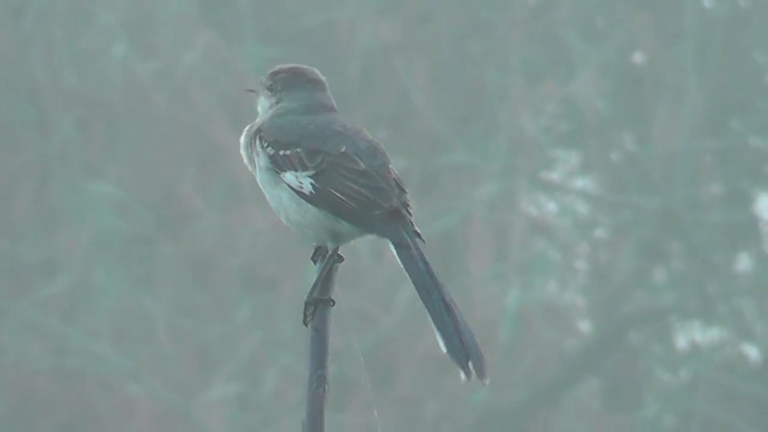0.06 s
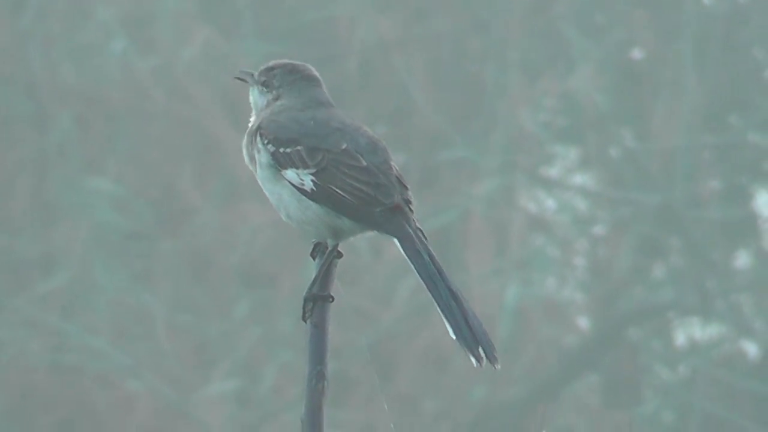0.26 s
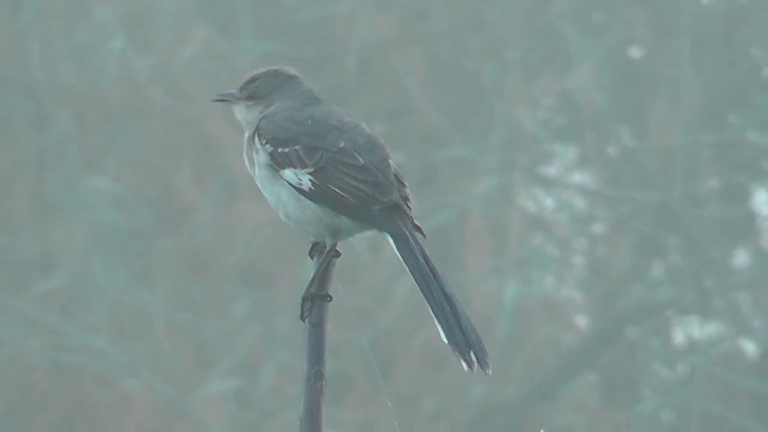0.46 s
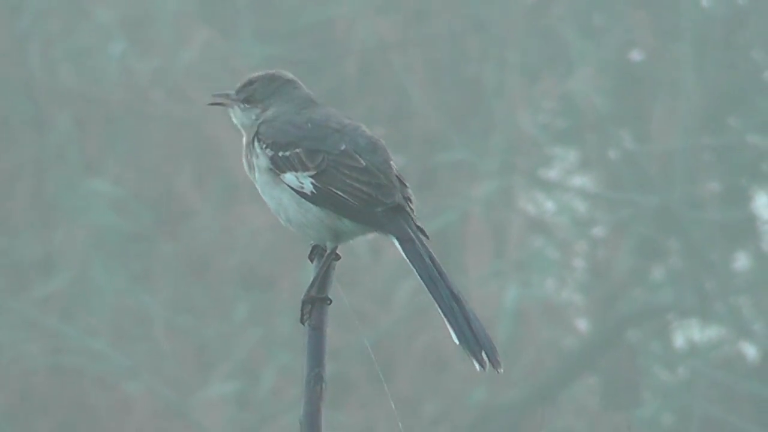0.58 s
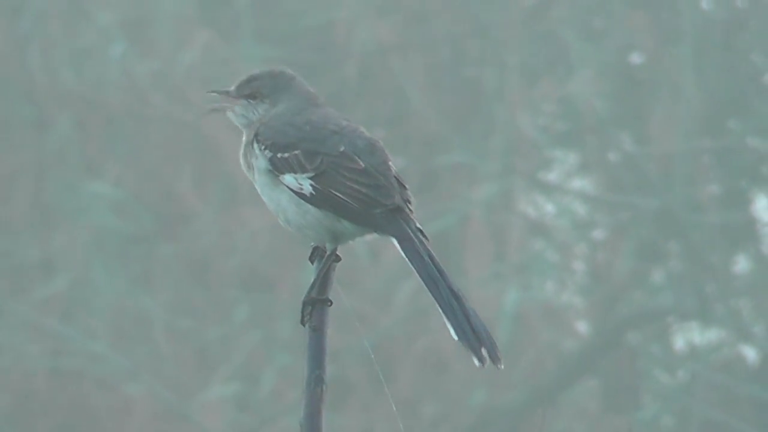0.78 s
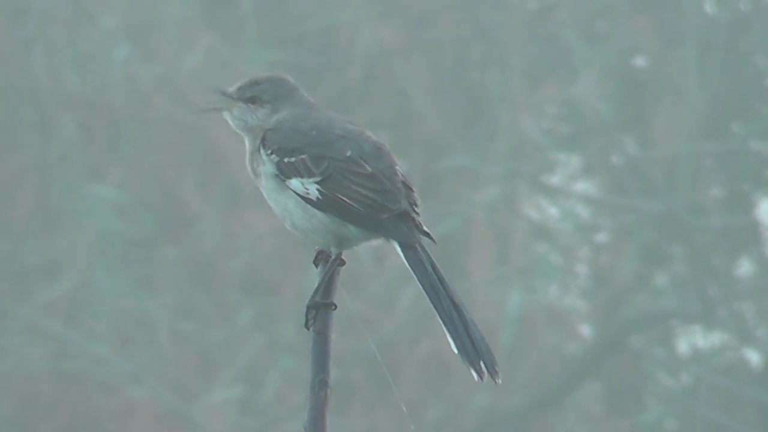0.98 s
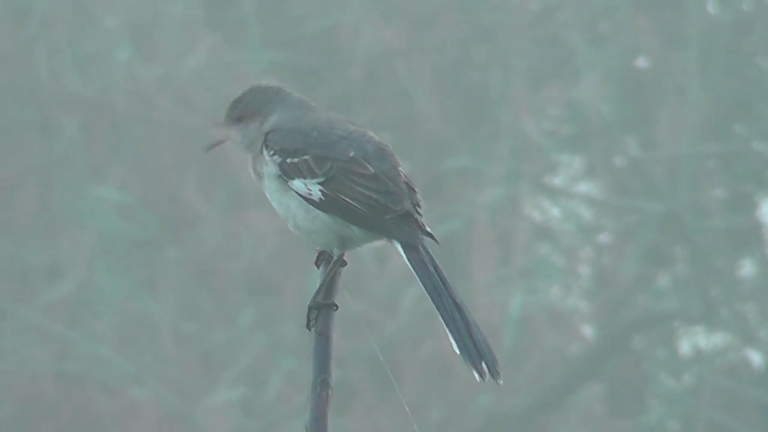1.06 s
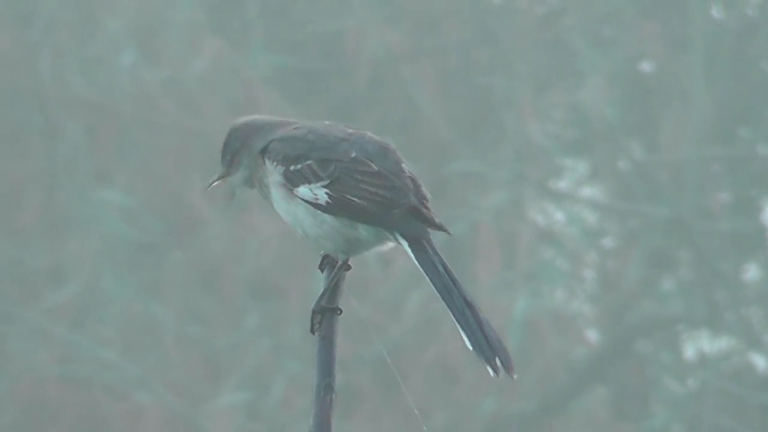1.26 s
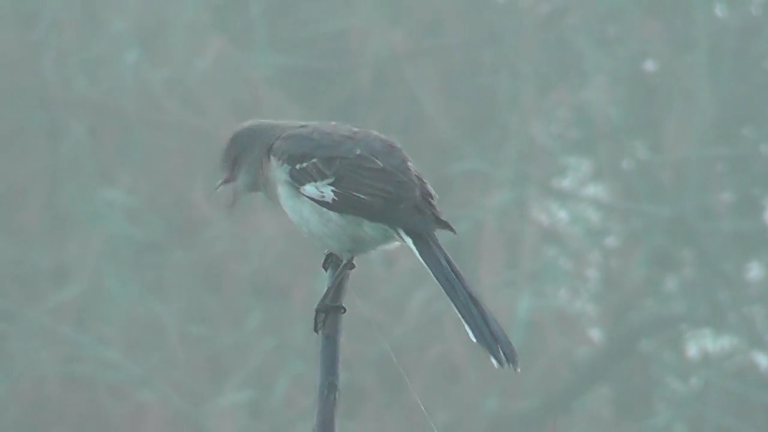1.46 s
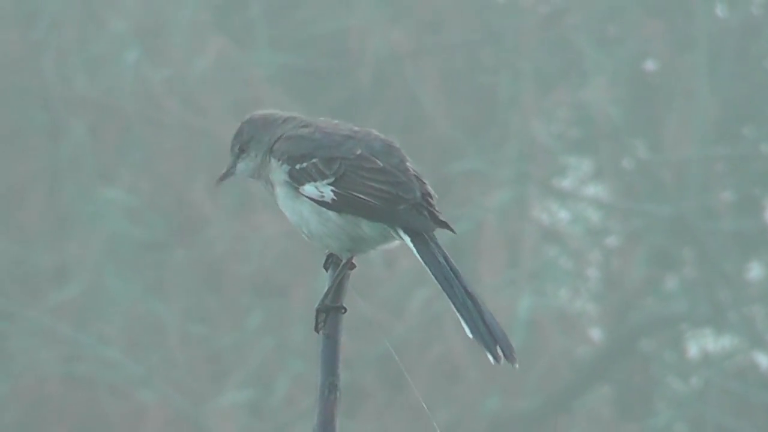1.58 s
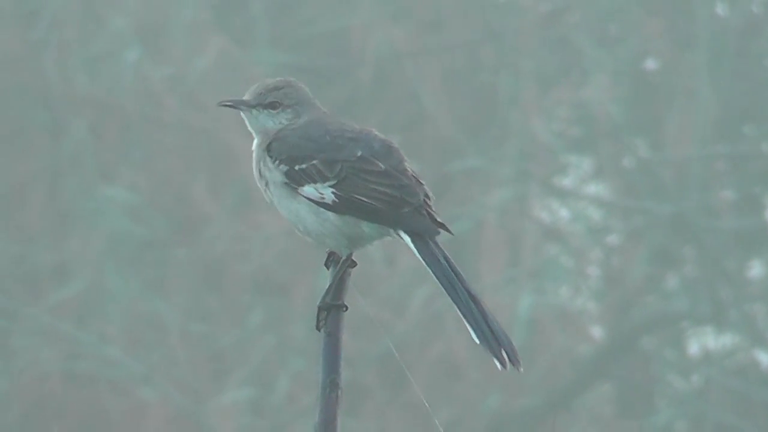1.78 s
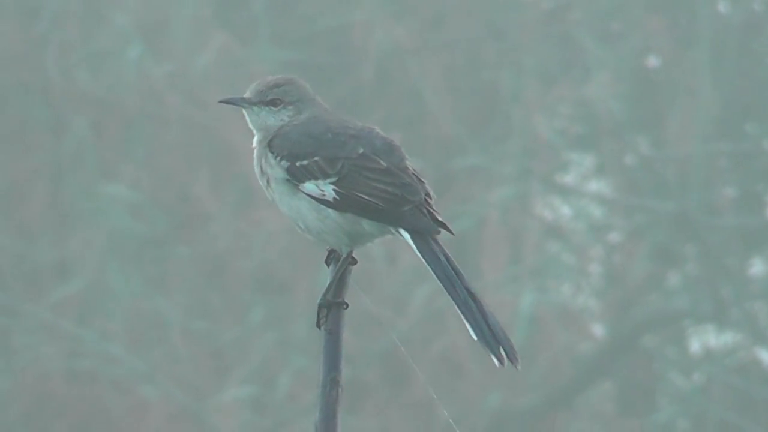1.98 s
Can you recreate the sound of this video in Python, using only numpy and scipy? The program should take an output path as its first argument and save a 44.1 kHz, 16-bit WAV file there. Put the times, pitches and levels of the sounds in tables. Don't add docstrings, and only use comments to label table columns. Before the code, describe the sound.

A songbird a few metres away sings quick falling whistles, sharp chips, husky rasps and a buzzy chord, lightly echoed by trees, over thin cricket trills and a steady distant road rush, on a small camera microphone.

```python
import sys
import numpy as np
from scipy import signal
from scipy.fft import rfft, irfft, next_fast_len
from scipy.io import wavfile
from scipy.ndimage import uniform_filter1d, map_coordinates

SR = 44100
rng = np.random.default_rng(int(sys.argv[2]) if len(sys.argv) > 2 else 0)


def gain_from_decibels(decibels):
    exponent = np.asarray(decibels, float) / 20
    return 10 ** exponent


def store_pcm(level_fs):
    pcm = np.round(np.clip(level_fs, -1, 1) * 32767).astype(np.int16)
    wavfile.write(sys.argv[1], SR, np.atleast_2d(pcm).T)


N = 90405


def unit(x):
    return x / np.sqrt(np.mean(x ** 2) + 1e-20)


def along(points, hz, closed=False):
    f, v = np.transpose(points)
    ends = dict(left=-120, right=-120) if closed else {}
    return np.interp(np.log(hz + 1), np.log(f + 1), v, **ends)


def wobble(rate_hz, size=N):
    knots = rng.standard_normal(int(size * rate_hz / SR) + 4)
    return map_coordinates(knots, [np.arange(size) * rate_hz / SR])


def filtered(x, response):
    m = next_fast_len(N + SR // 2)
    return irfft(rfft(x, m) * response(np.fft.rfftfreq(m, 1 / SR)), m)[..., :N]


def coloured_noise(spectrum):
    return unit(filtered(rng.standard_normal(N), lambda hz: gain_from_decibels(along(spectrum, hz, True))))


def placed(x, lean, lead):
    def ports(hz):
        left_over_right = gain_from_decibels(along(lean, hz)) * np.exp(1j * along(lead, hz))
        return left_over_right ** np.array([[.5], [-.5]])
    return filtered(x, ports)


def tone(hz, order=1):
    phase = order * 2 * np.pi * np.cumsum(hz) / SR + rng.uniform(0, 2 * np.pi)
    return np.sqrt(2) * np.sin(phase) * (order * hz < SR / 2)


def add(out, s, x):
    part = out[round(s * SR):][:len(x)]
    part += x[:len(part)]


def progress(length_s):
    return np.arange(0, length_s, 1 / SR) / length_s


def follow(rows):
    s, *cols = np.transpose(rows)
    t = np.arange(s[0], s[-1], 1 / SR)
    gate = np.clip(np.minimum(t - s[0], s[-1] - t) / 0.0016, 0, 1)
    return [uniform_filter1d(np.interp(t, s, c), size=60) for c in cols] + [gate]


# f/Hz, likeness [0-1]
PORT_LIKENESS = [(130, 0.63), (400, 0.89), (800, 0.62), (1500, 0.38), (3000, 0.68), (6800, 0.81),
                 (9000, 0.52), (15000, 0.4)]
# f/Hz, level/dB
BACKGROUND_LEAN = [(60, -3), (150, -5), (380, -5), (950, 2), (2380, 1), (5980, 1.5), (15000, 0.5)]
# f/Hz, phase/rad
BACKGROUND_LEAD = [(100, .3), (430, 0.57), (1100, 0.5), (1700, 0.89), (2500, 0)]


def rush(spectrum, patchy_db):
    z = signal.stft(rng.standard_normal((2, N)), nperseg=512)[2]
    field = uniform_filter1d(rng.standard_normal(z.shape[1:]), size=6, axis=0)
    field = uniform_filter1d(field, size=12, axis=1)
    pair = signal.istft(z * gain_from_decibels(patchy_db * unit(field)), nperseg=512)[1][:, :N]

    def mid_side(hz):
        turn = np.arccos(np.clip(along(PORT_LIKENESS, hz), -1, 1)) / 2
        return gain_from_decibels(along(spectrum, hz, True)) * [np.cos(turn), np.sin(turn)]

    mid, side = filtered(pair, mid_side)
    return unit(placed(np.array([mid + side, mid - side]), BACKGROUND_LEAN, BACKGROUND_LEAD))


# f/Hz, level/dB per Hz
ROAD_SPECTRUM = [(60, -63), (200, -38), (330, -14.5), (445, -10), (540, -3.5), (760, -2.5), (1200, -11),
                 (1800, -20.5)]


def road():
    return gain_from_decibels(-39 + .5 * wobble(2.26)) * rush(ROAD_SPECTRUM, patchy_db=0.4)


# f/Hz, level/dB per Hz
AIR_SPECTRUM = [(1250, -11.5), (1900, 1), (4000, -6.5), (5200, -6.5), (7500, -9.5), (9000, -13),
                (13000, -12.5), (15800, -15)]


def air():
    return gain_from_decibels(-49) * rush(AIR_SPECTRUM, patchy_db=1.47)


# f/Hz, level/dB per Hz
CHORUS_SPECTRUM = [(5300, -22.5), (5900, -2.5), (6300, 3.5), (6700, -7), (7000, -19)]


def far_chorus():
    return gain_from_decibels(-52) * rush(CHORUS_SPECTRUM, patchy_db=1.2)


# stroke rate/Hz, middle of the first stroke t/s
WING_STROKES = [(43.72, .0124), (44.85, .0150)]
# top f/Hz, level/dB, sounding share of the cycle [0-1]
CRICKET_VOICES = [
    (6834, -45.5, .56),
    (6750, -50, .58),
]


def crickets():
    sag_hz, stroke_lean, octave_db = 505.4, 0.14, -19.5
    out, t = np.zeros(N), np.arange(N) / SR
    for (rate_hz, first_s), (top_hz, db, share) in zip(WING_STROKES, CRICKET_VOICES):
        cycle = ((t - first_s) * rate_hz + .5) % 1 - .5
        u = np.clip(cycle * 2 / share, -1, 1)
        hz = top_hz - sag_hz * (u + stroke_lean) ** 2 + 25 * wobble(200)
        level = gain_from_decibels(db + 0.58 * wobble(30.0) + .4 * wobble(1.3))
        swell = level * np.cos(np.pi * u / 2) ** 0.3
        out += swell * (tone(hz) + gain_from_decibels(octave_db) * tone(hz, order=2))
    return out


# delay t/s, level/dB
BRANCH_ECHOES = [
    (.004, -21),
    (.0105, -22),
    (.0165, -18),
    (.026, -22),
]
# f/Hz, level/dB
LEAF_REFLECTION = [(2300, -3), (4200, -2.5), (5500, 1.5), (9000, 6)]


def trees(x):
    near_t60_s, far_t60_s, far_db = 0.47, 1, -12
    tail_db, alike, smear_s = -12.5, 0.7, .005
    t = np.arange(SR // 2) / SR
    shared, separate = rng.standard_normal(len(t)), rng.standard_normal((2, len(t)))
    leaves = np.sqrt(alike) * shared + np.sqrt(1 - alike) * separate
    tail = gain_from_decibels(-60 * t / near_t60_s) + gain_from_decibels(far_db - 60 * t / far_t60_s)
    tail = tail * np.clip(t / 0.00095, 0, 1)
    tail = tail * gain_from_decibels(tail_db) / np.linalg.norm(tail)
    for delay_s, db in BRANCH_ECHOES:
        bump = np.exp(-np.abs(t - delay_s) / smear_s * 2)
        tail = np.hypot(tail, gain_from_decibels(db) * bump / np.linalg.norm(bump))
    bright = filtered(x, lambda hz: gain_from_decibels(along(LEAF_REFLECTION, hz)))
    return signal.fftconvolve(bright[None], leaves * tail, axes=1)[:, :N]


# t/s, peak level/dB
TWIG_SNAPS = [
    (1.689, -31),
    (1.789, -36.5),
]


def twig_snaps():
    out = np.zeros(N)
    t = np.arange(100) / SR
    for s, db in TWIG_SNAPS:
        add(out, s, gain_from_decibels(db - 60 * t / .002) * np.diff(rng.standard_normal(len(t) + 1)) / 2)
    return out


# t/s, length/s, from f/Hz, to f/Hz, level/dB
SMALL_SLIDES = [(0.212, 0.0081, 3500, 3200, -36.5), (.335, 0.014, 5560, 5600, -45),
                (0.676, 0.018, 5450, 5450, -44), (1.298, .02, 7400, 7400, -55),
                (.933, 0.01894, 5300, 4500, -49), (0.802, .006, 8000, 7950, -55),
                (1.276, 0.021, 2325, 3280, -53), (1.523, 0.029, 4350, 3550, -51),
                (1.52, 0.02, 4890, 4361, -54), (1.526, 0.037, 5810, 5400, -49),
                (1.616, 0.019, 3426, 3500, -50), (1.6569, 0.006, 2730, 2720, -43),
                (1.6675, 0.0098, 2670, 2615, -44.5), (1.7115, 0.0068, 4390, 4120, -53),
                (1.739, 0.012, 4560, 3800, -49), (1.773, 0.024, 5600, 5380, -46)]


def small_slides():
    out = np.zeros(N)
    for s, length_s, from_hz, to_hz, db in SMALL_SLIDES:
        u = progress(length_s)
        hz = from_hz + (to_hz - from_hz) * u + 85 * wobble(290, len(u))
        swell = np.sin(np.pi * u ** .7)
        add(out, s, gain_from_decibels(db) * swell * tone(hz))
    return out


# t/s, length/s, from f/Hz, to f/Hz, level/dB
HUSKY_RASPS = [
    (.335, .035, 4800, 3300, -44.5),
    (0.16, 0.062, 2036, 4100, -41),
    (0.9, 0.049, 3500, 2540, -44.5),
    (1.13, 0.053, 2000, 3500, -44),
    (1.424, 0.049, 2150, 3250, -44),
    (1.8, 0.045, 2300, 2900, -45.5),
    (1.609, .032, 2350, 3050, -52),
]


def rasps():
    shake_hz, depth, rough_hz = 600, .7, 340
    out = np.zeros(N)
    for s, length_s, from_hz, to_hz, db in HUSKY_RASPS:
        u = progress(length_s)
        shake = depth * shake_hz * tone(shake_hz * (1 + 0.1295 * wobble(150.3, len(u))))
        hz = from_hz + (to_hz - from_hz) * u + shake + rough_hz * wobble(898.3, len(u))
        grain = gain_from_decibels(db + 3 * wobble(403, len(u)))
        swell = np.abs(np.sin(np.pi * u ** 1.27)) ** .65
        add(out, s, grain * swell * tone(hz))
    return out


# t/s, high voice f/Hz, sum tone of both voices f/Hz, effort level/dB
BUZZ_COURSE = [(1.282, 2423, 4020, -61.5), (1.292, 2490, 4070, -43.5), (1.32, 2486, 4086, -43),
               (1.328, 2615, 4235, -42), (1.433, 2675, 4305, -41.5), (1.515, 2607, 4160, -47.5),
               (1.524, 2570, 4090, -50), (1.54, 2460, 4000, -58)]
# order of the high voice, order of the low voice, level/dB
BUZZ_PARTIALS = [(1, 0, -6), (1, 1, -9), (2, 0, -6.5), (1, 2, -5), (0, 2, -19), (3, 0, -35), (2, -1, -16),
                 (1, -1, -12), (2, 2, -26)]
# f/Hz, level/dB per Hz
BUZZ_BREATH = [(2000, -26), (3500, -13), (5500, 9), (7500, -6), (9500, -20.5)]


def buzz():
    opens_s, shut_db, breath_db, top_fade_db = 1.322, -8, -6, -4
    out = np.zeros(N)
    high, both, db, gate = follow(BUZZ_COURSE)
    size, start_s = len(db), BUZZ_COURSE[0][0]
    low = both - high + 26 * wobble(254.0, size)
    high = high + 14 * wobble(255, size)
    fade_db = top_fade_db * np.linspace(-.5, .5, size)
    beak_db = shut_db * (start_s + np.arange(size) / SR < opens_s)
    beak_db = uniform_filter1d(beak_db, size=200)
    chord = np.zeros(size)
    for a, b, level_db in BUZZ_PARTIALS:
        partial_db = level_db + (a + b == 1) * beak_db + (b + 1 - a) * fade_db
        grain_db = wobble(19.0, size) + 2.2 * wobble(169, size)
        chord += gain_from_decibels(partial_db + grain_db) * tone(a * high + b * low)
    breath = gain_from_decibels(breath_db + 1.5 * wobble(89.0, size)) * coloured_noise(BUZZ_BREATH)[:size]
    add(out, start_s, gate * gain_from_decibels(db) * (chord + breath))
    return out


# top t/s, top f/Hz, level/dB, half length/s, drop f/Hz
THROAT_HOOKS = [
    (.3245, 5600, -35, 0.007, 750),
    (.6703, 5760, -51.5, .0062, 1250),
    (.6746, 5410, -39.5, .0105, 2210),
    (.932, 6150, -28, .0075, 900),
    (0.9318, 5400, -35, 0.0115, 2300),
    (1.7725, 6100, -38, 0.0085, 950),
    (1.7738, 5480, -31, .0088, 1950),
]
# f/Hz, level/dB per Hz
HOOK_PUFF = [(3000, -12), (5000, 5), (7500, -7), (8800, -18), (10500, -28.5)]


def hooks():
    fall_speed = 1.3
    out = np.zeros(N)
    breath = coloured_noise(HOOK_PUFF)
    for s, top_hz, db, half_s, drop_hz in THROAT_HOOKS:
        v = np.arange(-half_s, half_s / fall_speed, 1 / SR) / half_s
        u = np.clip(np.maximum(-v, fall_speed * v), 0, 1)
        hz = top_hz - drop_hz * u ** 1.55 + 90 * wobble(610, len(u))
        edge_db = -9 - 3 * (v > 0)
        shape = gain_from_decibels(db + edge_db * u) * np.clip(4 * (1 - u), 0, 1)
        octave = gain_from_decibels(-40 + 21 * u) * tone(hz, order=2)
        add(out, s - half_s, shape * (tone(hz) + octave))
        puff = np.sqrt(np.abs(1 - u)) * breath[round(s * SR):][:len(u)]
        add(out, s - half_s, gain_from_decibels(db - 7) * puff)
    return out


# t/s, f/Hz, level/dB, octave level/dB
FALLING_SLURS = [
    [(.198, 4840, -50, -74), (.206, 4650, -35, -52), (.212, 4597, -24, -45.5), (.222, 4260, -21, -38.5),
     (.226, 3975, -18.5, -40), (.241, 3300, -19.5, -50), (.248, 3170, -31, -47), (.254, 2900, -24, -49),
     (.263, 2780, -37, -67)],
    [(.798, 5060, -56, -72), (.802, 4990, -39, -54), (.8075, 4830, -51, -57), (.815, 4455, -31.5, -46.5),
     (.825, 4413, -30.5, -47.5), (.833, 4050, -25, -36.5), (.847, 3580, -30, -37), (.858, 3355, -31.5, -52),
     (.868, 3270, -57, -66)],
]
# t/s, f/Hz, level/dB, octave level/dB
LOW_WHISTLE = [(.301, 2060, -48, -66), (.307, 2190, -37, -62), (.311, 2430, -30, -60),
               (.316, 2620, -27.5, -56), (.326, 2520, -27, -56), (.331, 2390, -33, -56),
               (.341, 2340, -37.5, -60), (.349, 2190, -34, -62), (.353, 2000, -50, -70)]
# third level/dB, fourth level/dB
WHISTLE_UPPER_DB = [(-21, -33), (-16, -22), (-5, -30)]


def whistles():
    out = np.zeros(N)
    for rows, (third_db, fourth_db) in zip([*FALLING_SLURS, LOW_WHISTLE], WHISTLE_UPPER_DB):
        hz, db, octave_db, gate = follow(rows)
        flutter = gain_from_decibels(1.1 * wobble(256, len(hz)))
        upper = tone(hz, order=2) + gain_from_decibels(third_db) * tone(hz, order=3) + gain_from_decibels(fourth_db) * tone(hz, order=4)
        upper = upper * gain_from_decibels(octave_db + 4 * wobble(410, len(hz)))
        add(out, rows[0][0], gate * flutter * (gain_from_decibels(db) * tone(hz) + upper))
    return out


# f/Hz, level/dB
NEAR_LEAN = [(2300, -2), (3300, -2), (4200, 1), (6800, 1), (12000, .8)]
# f/Hz, phase/rad
NEAR_LEAD = [(2400, -.4), (3100, 0), (3900, .4), (4800, 0)]


def scene():
    bird = whistles() + hooks() + small_slides() + rasps() + buzz()
    near = bird + twig_snaps() + crickets()
    near = filtered(near, lambda hz: 1 / (1 + (1500 / (hz + 1)) ** 8))
    direct = placed(near, NEAR_LEAN, NEAR_LEAD)
    return direct + trees(near) + road() + air() + far_chorus()


def top_cut(x):
    return signal.sosfilt(signal.butter(12, 15830, fs=SR, output="sos"), x)


def record(dry):
    return top_cut(dry)


dry = scene()
out = record(dry)
store_pcm(out)
```